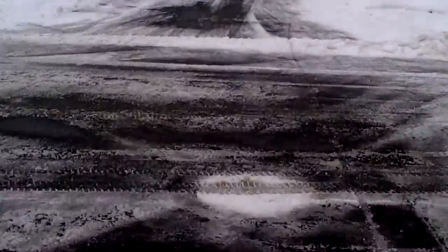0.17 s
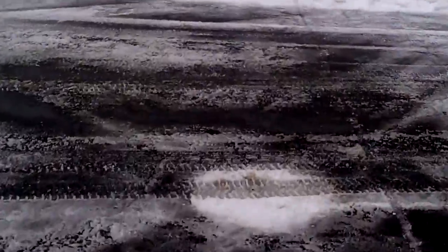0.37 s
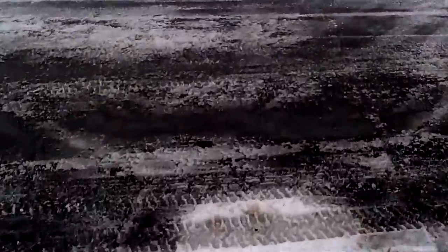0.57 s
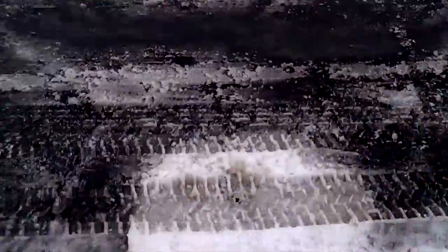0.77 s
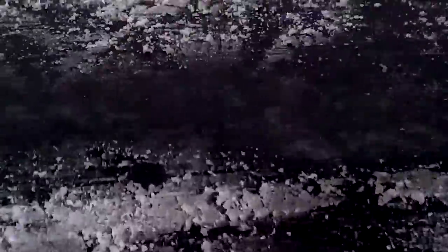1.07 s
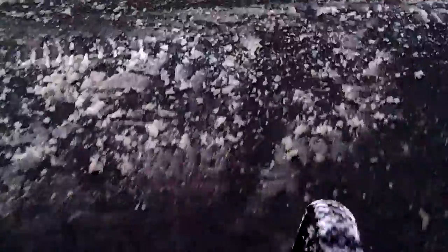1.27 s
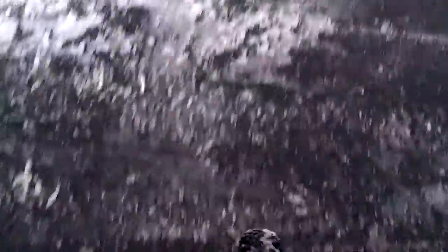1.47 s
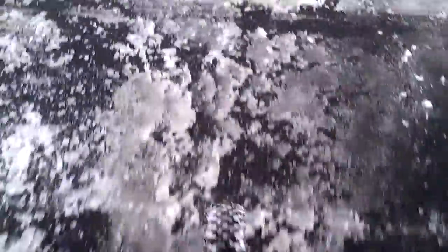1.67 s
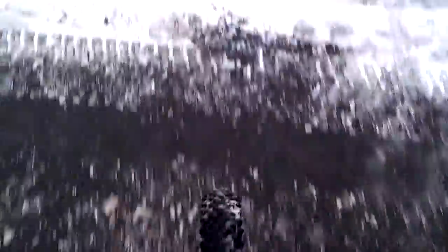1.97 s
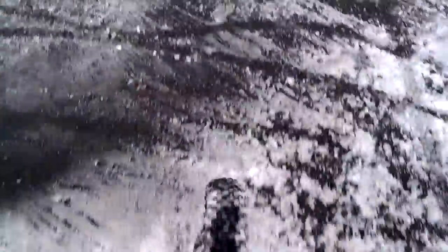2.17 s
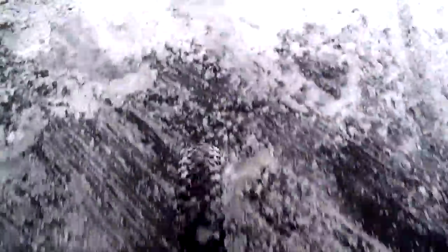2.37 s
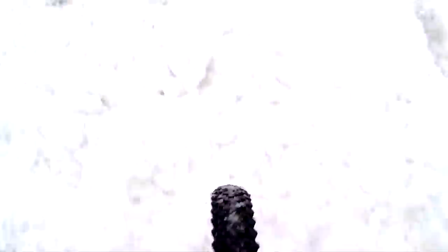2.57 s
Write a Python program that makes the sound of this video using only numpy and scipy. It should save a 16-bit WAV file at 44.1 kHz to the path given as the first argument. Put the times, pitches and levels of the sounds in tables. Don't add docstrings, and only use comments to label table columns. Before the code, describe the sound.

A bicycle tyre crunches over snow and slush throughout, mono and close from the handlebar. Dense brittle crackling until 0.4 s softens into duller grinding, with rut thuds near 0.57, 0.8 and 1.03 s. Wind buffets low and strongest around 1.0-1.6 s, over uneven, lighter crunching. A sharp snap at 2.3 s leads to loud, dense cracking around 2.5-2.7 s. Fine wet spray hisses above.

```python
import sys
import numpy as np
from scipy import signal
from scipy.io import wavfile
from scipy.ndimage import uniform_filter1d

SR = 44100
rng = np.random.default_rng(int(sys.argv[2]) if len(sys.argv) > 2 else 0)


def gain_from_db(level_db):
    decades = np.asarray(level_db, float) / 20
    return 10 ** decades


def generate_wav(sig):
    pcm = np.round(np.clip(np.atleast_2d(sig).T, -1, 1) * 32767).astype(np.int16)
    wavfile.write(sys.argv[1], SR, pcm)


N = 119511
SHORT_T = np.arange(-882, 882) / SR


def evened(x):
    return x / np.sqrt(np.mean(x ** 2) + 1e-20)


def along(table, column=1):
    points = np.array(table)
    return np.interp(np.arange(N) / SR, points[:, 0], points[:, column])


def coloured(x, points, below_db=-30):
    f, level = np.transpose(points)
    hz = abs(np.fft.fftfreq(16384, 1 / SR)) + 1
    octaves_below = np.clip(np.log2(f[0] / hz), 0, 2)
    level_db = np.interp(np.log(hz), np.log(f), level) + below_db * octaves_below
    log_gain = np.log(gain_from_db(level_db))
    phase = -signal.hilbert(log_gain).imag
    taps = np.fft.ifft(np.exp(log_gain + 1j * phase)).real[:8192]
    return signal.fftconvolve(x, taps / np.linalg.norm(taps))[:N]


def drift(seconds):
    width = max(int(seconds * SR), 2)
    once = uniform_filter1d(rng.standard_normal(N), width)
    return evened(uniform_filter1d(once, width))


def swells(table):
    t = np.arange(N) / SR
    power = np.zeros(N)
    for centre, length, db in table:
        power += gain_from_db(2 * db) * np.exp(-(2 * (t - centre) / length) ** 4)
    return np.sqrt(power)


def cracks(per_s, spread_db):
    size = gain_from_db(spread_db * np.minimum(rng.exponential(1, N), 4))
    strength = size * rng.standard_normal(N)
    return evened(strength * (rng.random(N) < per_s / SR))


def add(mix, s, sound):
    part = mix[max(round(s * SR) - len(sound) // 2, 0):][:len(sound)]
    part += sound[:len(part)]


def wavelet(hz, turns, phase, ring=0.96):
    stretch = np.where(SHORT_T > 0, ring, 1)
    bell = np.exp(-(SHORT_T * hz / turns / stretch) ** 2)
    return bell * np.cos(2 * np.pi * hz * SHORT_T + phase)


# time_s, crunch_db, softness_db (level of the low body)
TREAD_SNOW = [(0, -41.5, -4), (.3, -44, -0.5), (.4, -43.5, 5.5), (.56, -47, 10.5), (.63, -46.5, 4.5),
              (.82, -47.5, 7), (.87, -53.5, 6.5), (.97, -42, -4.5), (1.1, -49.5, 5), (1.2, -45.5, 3),
              (1.4, -49, 7), (1.5, -43, 2.5), (1.6, -48.5, 4), (1.9, -43, -2.5), (1.97, -46.5, 2.5),
              (2.27, -46, 0.5), (2.45, -43.5, -3), (2.71, -41.5, 1)]
# centre_s, length_s, level_db
CRUSHED_LUMPS = [(.085, 0.012, -37), (.13, 0.022, -38), (.198, 0.036, -40.5), (.255, 0.048, -40.5),
                 (.309, 0.0044, -36.5), (.383, 0.024, -39.5), (.51, 0.088, -45.5), (.02, 0.021, -46.5),
                 (.178, 0.02, -43), (.434, 0.0088, -47), (.927, .01, -50), (1.858, 0.013, -39),
                 (2.652, 0.0067, -45), (.8, 0.054, -46), (.963, 0.034, -55), (1.038, 0.04, -41),
                 (1.196, 0.059, -45.5), (1.254, 0.01, -44.5), (1.303, 0.031, -43), (1.337, 0.016, -44.5),
                 (1.533, 0.044, -45), (1.607, 0.011, -51), (1.63, 0.021, -41.5), (1.42, 0.0093, -47.5),
                 (.347, 0.0056, -41.5), (2.045, 0.048, -46), (2.314, 0.019, -36), (2.385, 0.037, -40.5),
                 (2.455, .03, -45), (2.549, 0.0089, -34), (2.578, 0.023, -32.5), (2.655, 0.014, -39),
                 (2.702, 0.0096, -41)]
# pitch_hz, level_db
HOUSING_TONE = [(1200, -4), (1650, -11.5), (2800, -0.5), (3900, 3), (5200, -10), (6300, -17), (7400, -26.5),
                (16000, -36)]
# pitch_hz, level_db
BODY_TONE = [(60, -39.5), (150, 4), (300, 1), (700, -0.5), (1200, -6), (1700, -15.5), (2400, -47)]


def tread():
    clump_db = 1.8 * drift(.007)
    level = np.hypot(gain_from_db(along(TREAD_SNOW) + clump_db), swells(CRUSHED_LUMPS))
    grains = cracks(6500, 1.6) * level

    share = 0.64
    scrape = cracks(1500, 1.8)
    scrape_db = along(TREAD_SNOW) + 1.2 * drift(.06)
    body = share * grains + np.sqrt(1 - share ** 2) * scrape * gain_from_db(scrape_db)
    body_db = -5 + along(TREAD_SNOW, column=2)

    colour_sway = np.tanh(.45 * drift(.012))
    crunch = grains + np.roll(colour_sway * grains, 3)
    return coloured(crunch, HOUSING_TONE, below_db=-27.5) + coloured(body * gain_from_db(body_db), BODY_TONE)


# centre_s, length_s, level_db
SPRAY_BURSTS = [(.254, 0.019, -53), (.473, 0.13, -54.5), (.723, 0.019, -45.5), (1.04, 0.033, -45.5),
                (1.192, 0.01, -45.5), (1.24, 0.027, -56), (1.342, 0.012, -51), (1.5, 0.12, -56),
                (1.626, 0.025, -53), (1.742, 0.034, -47.5), (2.073, 0.19, -58), (2.384, 0.023, -54),
                (2.583, 0.038, -50.5), (2.65, 0.033, -53)]
# pitch_hz, level_db
SPRAY_TONE = [(1500, -15), (5000, 4), (7000, -6), (10000, -5.5), (12500, -9.5), (16000, -16)]


def spray():
    flicker_db = 1.9 * drift(.015)
    hiss_db = -65.5 + 0.63 * (along(TREAD_SNOW) + 57.0)
    level = np.hypot(gain_from_db(hiss_db), swells(SPRAY_BURSTS)) * gain_from_db(flicker_db)
    return coloured(cracks(17000, 2.2) * level, SPRAY_TONE)


# time_s, gust_db, flutter_db
WIND_LEVELS = [(0, -46, -40.5), (.1, -46, -63), (.14, -49, -58), (.24, -47.5, -44), (.33, -50, -61),
               (.45, -49, -43.5), (.7, -46, -60), (.92, -52, -52), (1.0, -43, -41), (1.1, -44.5, -45),
               (1.18, -38.5, -45.5), (1.53, -42, -38.5), (1.6, -43.5, -51), (1.92, -49, -56.5),
               (2.04, -42, -56), (2.13, -48, -52.5), (2.32, -52.5, -53), (2.71, -51, -58)]
# pitch_hz, level_db
GUST_TONE = [(15, -6), (30, -3.5), (55, -4.5), (80, -7), (150, -37), (300, -49.5)]


def wind():
    gust_db = along(WIND_LEVELS) + 1.8 * drift(0.03)
    flaps_per_s, flap_hz = 130, 110
    sizes = rng.uniform(.4, 1, (2, N))
    flaps = sizes * (rng.random((2, N)) < flaps_per_s / SR)
    larger = signal.oaconvolve(flaps[0], -wavelet(flap_hz * .7, 0.3, 0.18), "same")
    smaller = signal.oaconvolve(flaps[1], -wavelet(flap_hz * 1.3, 0.3, 0.18), "same")
    flutter = larger + smaller
    flutter = evened(flutter - flutter.mean())
    rumble = coloured(rng.standard_normal(N), GUST_TONE)
    return rumble * gain_from_db(gust_db) + flutter * gain_from_db(along(WIND_LEVELS, column=2))


# time_s, peak_db, pitch_hz
CRUST_SNAPS = [(0.0432, -18, 3570), (0.1055, -18, 3250), (0.1919, -23, 3430), (0.1975, -20, 3410),
               (0.248, -21, 3490), (0.251, -18, 2960), (0.2773, -17, 3830), (0.3086, -23, 3630),
               (0.3119, -25, 3510), (0.3825, -25, 2990), (0.6495, -28, 3690), (0.7598, -29, 3360),
               (0.7941, -25, 3470), (0.8094, -25, 3490), (0.8129, -28, 3420), (0.8801, -31, 3290),
               (0.8856, -25, 3430), (0.925, -29, 3290), (0.9624, -22, 3350), (1.0385, -23, 3200),
               (1.3, -29, 3050), (1.3042, -29, 2890), (1.3365, -27, 3650), (1.4169, -30, 2880),
               (1.5322, -26, 3680), (1.6215, -28, 3120), (1.6336, -27, 3430), (1.7607, -27, 3680),
               (1.8233, -26, 3940), (1.8547, -26, 3370), (1.8828, -24, 3260), (1.917, -29, 3420),
               (2.035, -26, 3460), (2.0595, -28, 3560), (2.1469, -24, 3010),
               (2.3109, -21, 3010), (2.3167, -10, 3230), (2.3198, -26, 3120), (2.3664, -26, 3640),
              (2.3824, -24, 2880), (2.3924, -21, 3410), (2.4025, -25, 3310), (2.4561, -24, 3790),
              (2.5231, -25, 3850), (2.5359, -17, 3100), (2.5416, -23, 3500), (2.5504, -22, 3460),
              (2.574, -17, 2800), (2.5792, -19, 3000), (2.5824, -11, 3320), (2.5982, -16, 3290),
              (2.6049, -19, 3280), (2.6114, -16, 3480), (2.6161, -19, 3530), (2.649, -22, 3180),
              (2.6662, -25, 3320), (2.7018, -22, 3480),
               (.0122, -27, 3000), (.0835, -25, 3900), (.1172, -24, 3200), (.1245, -25, 3600),
                   (.1745, -25, 3900), (.2545, -27, 3030), (.28, -27, 3730), (.3543, -27, 2980),
                   (.3706, -27, 3140), (.3789, -28, 2580), (.4328, -29, 3660), (.5289, -29, 3930),
                   (.9013, -31, 3590), (1.0184, -30, 3600), (1.031, -27, 3630), (1.0345, -25, 3210),
                   (1.196, -30, 2910), (1.2217, -30, 3060), (1.2558, -30, 3230), (1.3394, -28, 3610),
                   (1.4871, -31, 3500), (1.5097, -30, 3390), (1.5469, -29, 2970), (1.6678, -30, 2900),
                   (1.871, -28, 3550), (2.3235, -28, 3550), (2.3873, -25, 3140), (2.4413, -27, 3790),
                   (2.5375, -21, 3600), (2.5697, -23, 3390), (2.577, -22, 3600), (2.6631, -26, 3320)]


def snaps():
    out = np.zeros(N)
    tail_s = .0022
    for s, db, hz in CRUST_SNAPS:
        phase = rng.uniform(-1.47, 1)
        click = wavelet(hz, .95, phase, ring=1.7)
        low = gain_from_db(-19) * wavelet(rng.uniform(860, 1360), 0.98, phase)
        edge = gain_from_db(-22) * wavelet(5600, 1.8, phase)
        noise = rng.standard_normal(len(SHORT_T))
        fading = np.exp(-abs(SHORT_T) / tail_s) * (SHORT_T > 0)
        splinters = gain_from_db(-16) * evened(np.convolve(noise, click, "same")) * fading
        peak = gain_from_db(db) - gain_from_db(-48)
        add(out, s, peak * (click + low + edge + splinters))
    return out


# time_s, peak_db, pitch_hz
LARGE_EDDIES = [(.0235, -32, 85), (0.138, -30.5, 60.5), (0.254, -35, 110), (0.4473, -37, 110),
                (0.6653, -33.5, 89), (.871, -37, 65), (1.0034, -27, 79), (1.157, -33, 96),
                (1.172, -30.5, 101), (1.199, -30, 91.5), (1.217, -33, 70.5), (1.2533, -30, 141),
                (1.3419, -27, 92), (1.3653, -32, 69), (1.605, -41, 80.5), (1.9718, -36, 100),
                (2.052, -36, 50.3), (2.092, -37, 80.4)]


def eddies():
    out = np.zeros(N)
    for s, db, hz in LARGE_EDDIES:
        add(out, s, -gain_from_db(db) * wavelet(hz, 0.59, rng.uniform(-0.53, 0.85)))
    return out


# time_s, peak_db
CRUST_KNOCKS = [(0.1055, -33.5), (0.1267, -32), (0.1302, -43), (0.1972, -35.5), (.251, -38), (0.355, -30.5),
                (0.399, -34), (0.5714, -34), (1.0327, -32.5), (2.31, -39), (2.3821, -40), (2.5361, -33),
                (2.66, -36)]


def knocks():
    out = np.zeros(N)
    for s, db in CRUST_KNOCKS:
        hz = 1087 * rng.uniform(0.69, 1.37)
        add(out, s, gain_from_db(db) * wavelet(hz, 1.6, rng.uniform(-0.37, 1), ring=1.23))
    return out


# time_s, peak_db, pitch_hz
FRAME_THUDS = [(.128, -54, 410), (.398, -31, 473), (.451, -50, 298), (.492, -43, 300), (.516, -40, 224),
               (.568, -26, 470), (.577, -29.5, 274), (.778, -34, 259), (.799, -25.5, 243), (.812, -36, 355),
               (1.034, -25, 134), (1.034, -28, 380), (1.037, -28, 960), (1.197, -27, 930),
               (1.303, -31, 410), (1.385, -32.5, 517), (1.492, -28, 134), (1.424, -25, 96),
               (1.76, -37, 288), (2.118, -36.5, 322), (.803, -32.5, 590), (2.3165, -31, 610),
               (2.617, -34.5, 380), (2.598, -28.5, 640), (2.666, -31, 280)]


def thuds():
    out = np.zeros(N)
    for s, db, hz in FRAME_THUDS:
        add(out, s, gain_from_db(db) * wavelet(hz, 0.54, rng.uniform(1.7, 3.2)))
    return out


def spoke_ping():
    out = np.zeros(N)
    start_s, peak_db, pitch_hz, fade_60db_s = 1.517, -42, 10600, .025
    level = gain_from_db(peak_db - 60 * abs(SHORT_T) / fade_60db_s) * (SHORT_T > 0)
    add(out, start_s, level * np.sin(2 * np.pi * pitch_hz * SHORT_T))
    return out


def scene():
    snow = tread() + snaps() + spray()
    bicycle = thuds() + knocks() + spoke_ping()
    air = wind() + eddies()
    return (snow + bicycle + air)[None]


def band_limit(x):
    return signal.sosfilt(signal.butter(12, 15690, fs=SR, output="sos"), x)


def record(dry):
    edge_hz = 15700
    low_pass = signal.firwin(511, edge_hz, window=("kaiser", 9), fs=SR)
    limited = signal.oaconvolve(dry, low_pass[None], "same")
    return band_limit(limited)


dry = scene()
out = record(dry)
generate_wav(out)
```